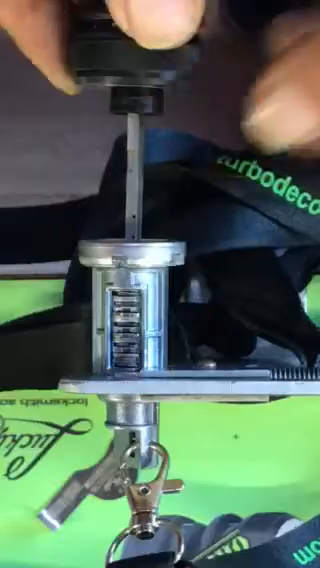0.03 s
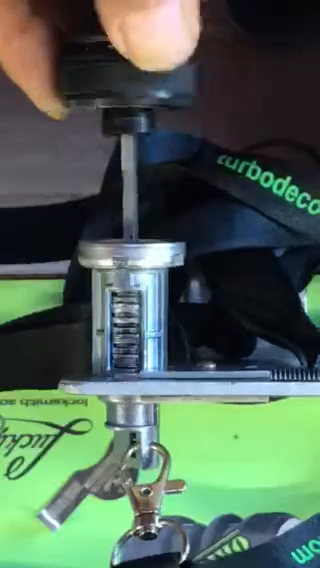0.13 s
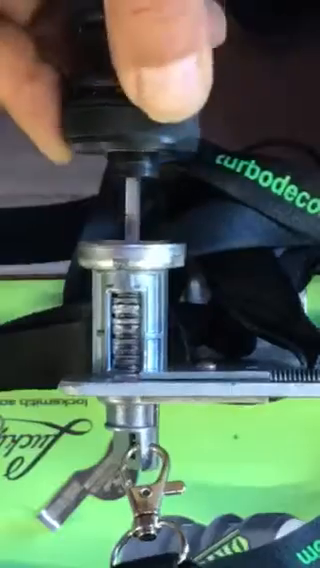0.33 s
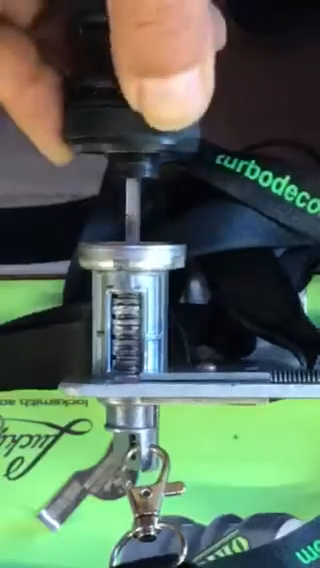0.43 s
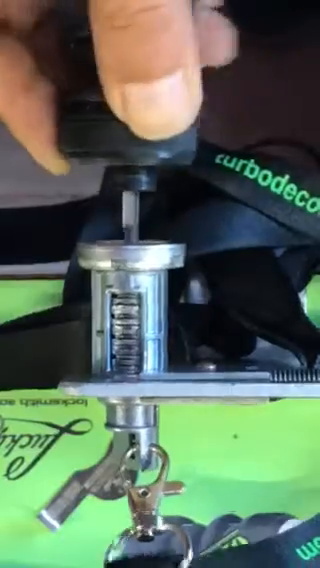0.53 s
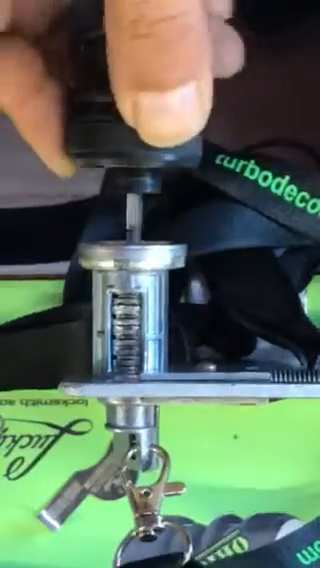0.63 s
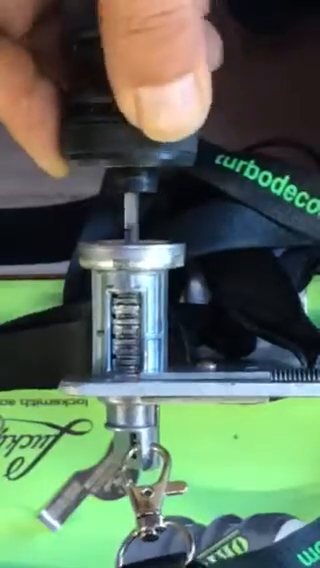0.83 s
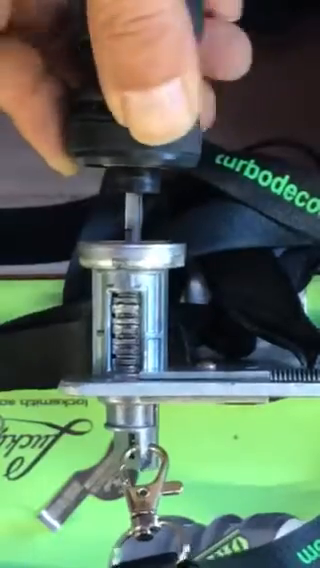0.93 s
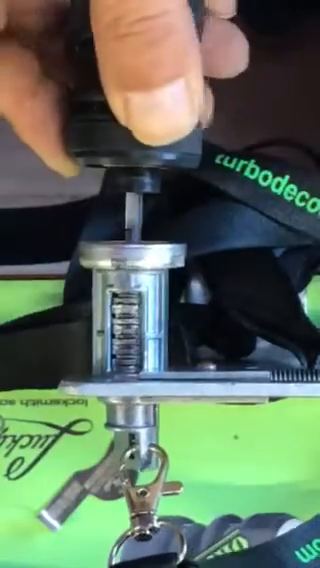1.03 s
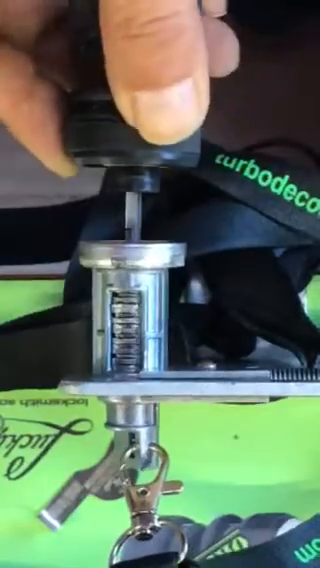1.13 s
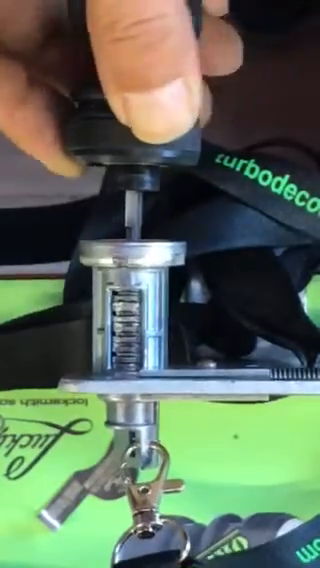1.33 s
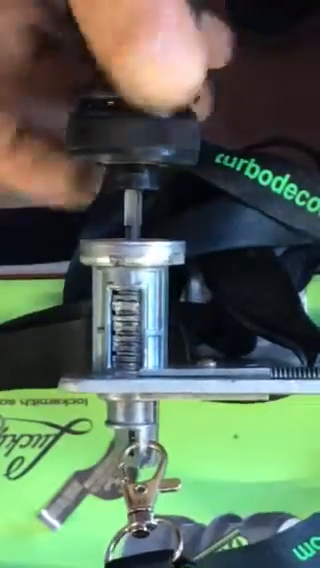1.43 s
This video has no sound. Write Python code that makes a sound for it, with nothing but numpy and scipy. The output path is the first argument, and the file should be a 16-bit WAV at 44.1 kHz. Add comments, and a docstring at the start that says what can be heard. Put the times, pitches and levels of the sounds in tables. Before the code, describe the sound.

Quick, close metal clicks and snaps as a thin tool is pushed into a lock cylinder.

```python
"""In a small, quiet room, a steel blade is pushed down into a lock clamped on a workbench, close by.
It scrapes and snaps past the wafers, the lock's little spring-loaded plates. The snaps knock the
lock's mount and the pushes thump the bench. The blade seats with a ringing clank, then settles
with a few faint ticks."""
import sys
import numpy as np
from scipy import signal
from scipy.fft import rfft, irfft
from scipy.io import wavfile

SR = 44100
rng = np.random.default_rng(int(sys.argv[2]) if len(sys.argv) > 2 else 0)


def to_wav(s):
    """Save 16-bit WAV."""
    ch = np.atleast_2d(s).T  # columns
    pcm = np.round(np.clip(ch, -1, 1) * 32767)  # PCM
    wavfile.write(sys.argv[1], SR, pcm.astype(np.int16))


N = 66150  # 1.5 seconds
CONTACT_S, HIGHEST_HZ, FLUTTER_HZ = 0.0004, 16000, 126


def gain(db):
    """Turns decibels into a multiplier."""
    return 10 ** (np.asarray(db) / 20)


def fade(t, fade_s, db=0):
    """Starts at db and falls 60 decibels every fade_s seconds."""
    return gain(db - 60 * t / fade_s)


def unit_level(x):
    """Scales a sound to an average (rms) level of 1."""
    return x / np.sqrt(np.mean(x ** 2) + 1e-20)


def add(mix, start_s, sound):
    """Mixes a sound in at its start time."""
    part = mix[round(start_s * SR):][:len(sound)]
    part += sound[:len(part)]


def band(x, low_hz, high_hz, order=3):
    """Keeps the sound between two pitches."""
    return signal.sosfilt(signal.butter(order, [low_hz, high_hz], "band", fs=SR, output="sos"), x)


def ring(notes, t, flutter=0, scatter=0):
    """A struck part's fading notes; flutter is loose-part chatter, scatter starts them out of step."""
    hz, db, fade_s = np.transpose(notes)[:, :, None]
    phase = 2 * np.pi * scatter * rng.random(hz.shape)
    noise = rng.standard_normal((2, len(hz), len(t)))
    waver = unit_level(band(noise, FLUTTER_HZ / 10, FLUTTER_HZ, order=2))
    chatter = 1 + flutter * (waver[0] + 1j * waver[1])
    tones = (chatter * np.exp(1j * (2 * np.pi * hz * t + phase))).imag
    return (fade(t, fade_s, db) * tones).sum(0) * (1 - np.exp(-t / CONTACT_S))


# The room's noise from bass to treble: pitch_hz, relative_db
ROOM_NOISE = [(20, -24), (45, -8), (108, -15.5), (242, -16), (317, -16), (659, -25.5), (1520, -26),
              (1790, -24), (2050, -30), (2910, -32), (5280, -42), (11000, -48), (16000, -47.5)]

def background(hum_hz=82.6, hiss_hz=12040, hiss_width_hz=280):
    """Soft room noise with a wavering low hum and a thin high hiss."""
    hz, db = np.transpose(ROOM_NOISE)
    shape = gain(np.interp(np.log(np.fft.rfftfreq(N, 1 / SR) + 1), np.log(hz), db))
    air = irfft(rfft(rng.standard_normal(N)) * shape, N)
    hum = band(rng.standard_normal(2 * N), hum_hz * 0.96, hum_hz * 1.04, order=2)[N:]
    hiss = band(rng.standard_normal(N), hiss_hz - hiss_width_hz / 2, hiss_hz + hiss_width_hz / 2, 1)
    return gain(-63) * unit_level(air) + gain(-65.5) * unit_level(hum) + gain(-84.5) * unit_level(hiss)


# Pushes that reach the bench: start_s, level_db
PUSHES = [(0.005, -50.5), (0.104, -43), (0.188, -35.5), (0.318, -32.5), (0.435, -32.5), (0.475, -44.5),
          (0.611, -28.5), (0.651, -35.5), (0.875, -50.5), (1.031, -57)]
# The bench top's low notes: pitch_hz, relative_db, fade_s
BENCH_NOTES = [(50.4, -17, 1), (72.8, -1, 0.25), (82.96, 0, 0.54), (101.7, -3.5, .45), (125.4, -5, 0.5),
               (206, -9.5, 0.48)]

def bench_thumps():
    """Each push sets the bench top swaying, and the room booms after it."""
    out, t = np.zeros(N), np.arange(SR) / SR
    sway = sum(fade(t, fade_s, db) * np.sin(2 * np.pi * hz * t) for hz, db, fade_s in BENCH_NOTES)
    rise = 1 - np.exp(-t / 0.0059)
    for start_s, db in PUSHES:
        rumble = unit_level(band(rng.standard_normal(len(t)), low_hz=71.4, high_hz=194))
        boom = rumble * fade(t, fade_s=0.68, db=-9)
        add(out, start_s, gain(db) * (sway + boom) * rise)
    return out


# The blade rubs along the key slot: start_s, length_s, level_db
SCRAPES = [(0.175, 0.032, -57.5), (0.306, 0.038, -51.5), (0.598, 0.0082, -37), (0.926, 0.016, -68)]

def blade_scrapes(slips_per_s=900, rub_share=0.015):
    """Tiny uneven slips over a soft rub, each with a short ring and a room echo."""
    out, t = np.zeros(N), np.arange(SR // 10) / SR
    one_slip = rng.standard_normal(len(t)) * (fade(t, fade_s=0.005) + fade(t, fade_s=0.093, db=-18))
    for start_s, length_s, db in SCRAPES:
        count = round(length_s * SR)
        friction = rng.standard_normal(N) * (rub_share + (rng.random(N) < slips_per_s / SR))
        scrape = band(signal.fftconvolve(friction[:count], one_slip), 2940, HIGHEST_HZ, order=1)
        add(out, start_s, gain(db) * scrape / np.std(scrape[:count]))
    return out


# A wafer spring's notes: pitch_hz, relative_db, fade_s
SPRING_NOTES = [(8600, -2, 0.1), (8500, -0.5, 0.093), (8800, -5, .05), (13560, -1, 0.093),
                (13630, -12, 0.076)]

def spring_ping():
    """A freed spring shivers with one high ping."""
    out, t = np.zeros(N), np.arange(SR // 2) / SR
    add(out, start_s=0.619, sound=gain(-43) * ring(SPRING_NOTES, t, flutter=0.87, scatter=0.66))
    return out


# Wafers landing: start_s, level_db
WAFER_DROPS = [(0.3438, -35), (0.6092, -32.5), (0.9324, -42.5), (1.3317, -48.5), (1.434, -59)]
# A wafer's notes: pitch_hz, relative_db, fade_s
WAFER_NOTES = [(864, -11, 0.12), (1206, 0.5, 0.073), (1360, -28, 0.017), (2680, -16.5, 0.062)]

def wafer_tocks():
    """Each wafer drops onto its stop with a hollow tock."""
    out, t = np.zeros(N), np.arange(SR // 2) / SR
    for start_s, db in WAFER_DROPS:
        add(out, start_s, gain(db) * ring(WAFER_NOTES, t, flutter=0.17))
    return out


# The steel tool's notes: pitch_hz, relative_db, fade_s
BLADE_NOTES = [(202.3, -16.5, 0.63), (302, -7.5, 0.24), (880, -12.5, 0.21), (1068, -6.5, 0.29),
               (1172, -4.5, 0.14), (1258, -18, 0.13), (1586, -8.5, 0.22), (1614, 0.5, 0.11),
               (1680, -3, 0.19), (1771, -7, 0.35), (1870, -11, .15), (8450, -33, .35), (8800, -31, 0.31),
               (9050, -39, 0.31)]

def seating_clank():
    """The blade hits the lock's housing and rings; the hand damps its first loud swing."""
    out, t = np.zeros(N), np.arange(SR // 2) / SR
    clank = gain(-33) * ring(BLADE_NOTES, t, flutter=0.24, scatter=1)
    first_swing = fade(t, fade_s=0.081, db=5.5)
    add(out, start_s=0.7348, sound=clank * (1 + first_swing))
    return out


# The blade meets a wafer: start_s, knock_db, clank_db, crack_db, snap_db, tick_db, sharpness
SNAPS = [(0.0894, -40.5, -49, -42.5, -57, -61, 22), (0.177, -50.5, -49, -56, -53, -59, 4.6),
         (0.194, -42, -48.5, -56, -59, -55.5, 6.2), (0.2065, -43.5, -49, -45.5, -58, -67, 20),
         (0.3074, -49, -44.5, -47.5, -49, -50, 18), (0.3103, -59, -62, -56, -60, -43, 3),
         (0.3142, -45, -44.5, -52, -66, -52, 6.5), (0.3275, -43, -52, -60, -54, -46, 3.7),
         (0.335, -70, -38.5, -66, -48.5, -48, 4.1), (0.3389, -39.5, -43.5, -42.5, -55, -44, 14),
         (0.3428, -50, -39, -41.5, -50, -58, 5.4), (0.4114, -50, -72, -77, -74, -50.5, 14),
         (0.4299, -52, -39.5, -37, -40, -37.5, 3.9), (0.4316, -33.5, -33.5, -31, -42, -40.5, 15.2),
         (0.4496, -37, -72, -45, -49.5, -62, 4.1), (0.599, -40, -43.5, -44.5, -42, -52, 2),
         (0.6033, -36.5, -41, -38, -38.5, -34.5, 1.5), (0.609, -34.5, -31, -39, -57, -58, 3.8),
         (0.6726, -67, -45.5, -58, -70, -57, 3), (0.7318, -43, -36, -42.5, -44, -49.5, 4.5),
         (0.799, -48, -45, -63, -65, -66, 3.1), (0.873, -50, -50, -59.5, -56, -59.5, 9.2),
         (0.9327, -51, -49.5, -62, -61.5, -62, 2), (1.028, -47.5, -52.5, -65, -58, -70, 10),
         (1.035, -86, -63, -64, -61.5, -61, 5), (1.3293, -57, -53.5, -66, -70.5, -70, 2.9)]
# Where those five levels sit, from low knock to high tick: pitch_hz
SNAP_PITCHES = [400, 1250, 2700, 4600, 11000]
# The metal's dense ringing, band by band: top_hz, relative_db, fade_s, echo_db, echo_fade_s
METAL_BANDS = [(445, -3, 0.11, -7.5, 0.31), (892, -4.5, 0.032, -6.5, 0.35), (1480, 0.5, 0.034, -8.5, 0.29),
               (1870, 1.5, 0.029, -13, 0.29), (3170, 1.5, 0.024, -13, 0.31), (6100, 2, 0.024, -15.5, 0.33),
               (9720, -1, 0.019, -14.5, 0.3), (17000, -2, 0.019, -17, 0.26)]
# The lock body's notes: pitch_hz, relative_db, fade_s
LOCK_NOTES = [(1079, -18, 0.29), (1202, 4, 0.081), (1247, -3, 0.21), (1282, -27, 0.057), (1360, -6.5, 0.18),
              (1601, -5, 0.21), (1742, -5.5, .15), (2567, -12, 0.23)]
# The mount's notes: pitch_hz, relative_db, fade_s
MOUNT_NOTES = [(204.86, -8, 0.45), (297.2, -1.5, 0.17), (318.3, 5, 0.17), (349, -8.5, 0.21),
               (620.3, -8.5, .15)]

def wafer_snaps(rise_cycles=1.73, sharp_above_hz=2190):
    """Each snap is a sharp click and a burst of ringing with a room echo; lock and mount ring on."""
    out, t = np.zeros(N), np.arange(SR // 2) / SR
    snap_db, sharpness = np.array(SNAPS)[:, 1:-1], np.array(SNAPS)[:, -1]
    snaps = np.zeros((len(SNAPS), len(t)))
    low_hz = 206
    for top_hz, db, fade_s, echo_db, echo_fade_s in METAL_BANDS:
        rise = 1 - np.exp(-t * top_hz / rise_cycles)  # low notes build up more slowly
        loudness = (fade(t, fade_s) + fade(t, echo_fade_s, echo_db)) * rise
        burst = rng.standard_normal(snaps.shape) * loudness
        burst[:, round(CONTACT_S * SR)] += sharpness * min(1, top_hz / sharp_above_hz)  # the click
        burst = band(burst, low_hz, top_hz)
        burst *= np.linalg.norm(loudness) / np.linalg.norm(burst, axis=1, keepdims=True)
        log_middle = np.log(low_hz * top_hz) / 2
        levels_db = [np.interp(log_middle, np.log(SNAP_PITCHES), row) for row in snap_db]
        snaps += gain(levels_db)[:, None] * gain(db) * burst
        low_hz = top_hz
    mount_rise = 1 - np.exp(-t / 0.006)
    for (start_s, knock_db, clank_db, *_), snap in zip(SNAPS, snaps):
        lock = gain(clank_db - 6.5) * ring(LOCK_NOTES, t, flutter=0.27, scatter=0.85)
        mount = gain(knock_db + 1.5) * ring(MOUNT_NOTES, t, flutter=0.1) * mount_rise
        add(out, start_s, snap + lock + mount)
    return out


def scene():
    """The lock, the bench and the room together in one channel."""
    metal = wafer_snaps() + wafer_tocks() + spring_ping() + seating_clank() + blade_scrapes()
    return (metal + bench_thumps() + background())[None]


def record(dry, low_cut_hz=49.6):
    """The microphone loses the deepest bass, and the highest treble is cut off."""
    thinned = signal.sosfilt(signal.butter(3, low_cut_hz, "high", fs=SR, output="sos"), dry)
    treble_cut = signal.firwin(255, HIGHEST_HZ, window=("kaiser", 8), fs=SR)
    return signal.oaconvolve(thinned, treble_cut[None], "same")


dry = scene()
out = record(dry)
to_wav(out)
```